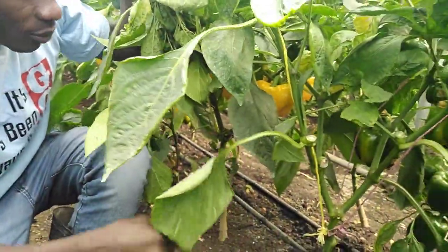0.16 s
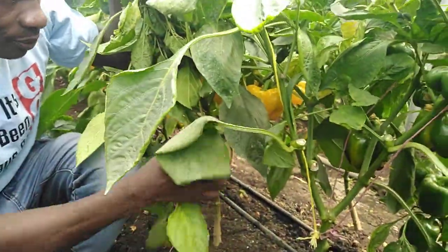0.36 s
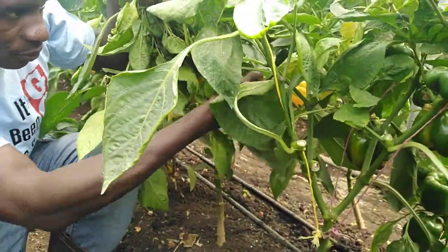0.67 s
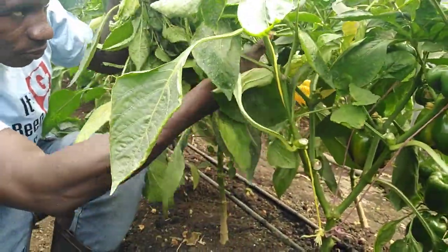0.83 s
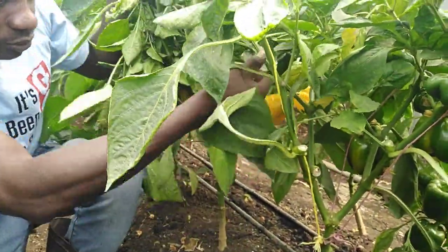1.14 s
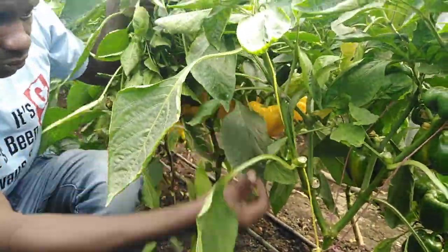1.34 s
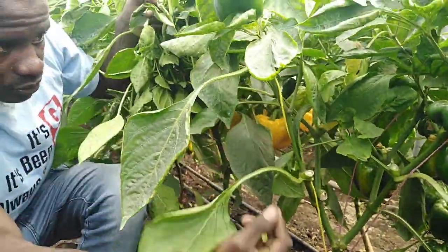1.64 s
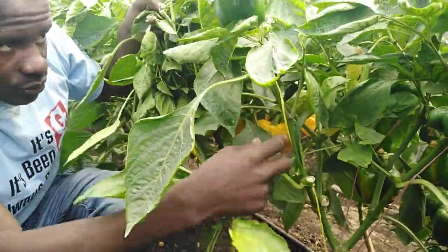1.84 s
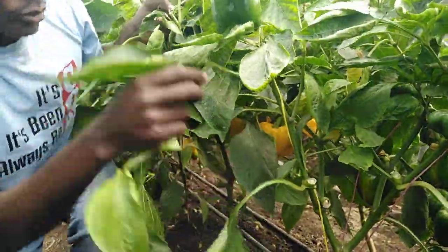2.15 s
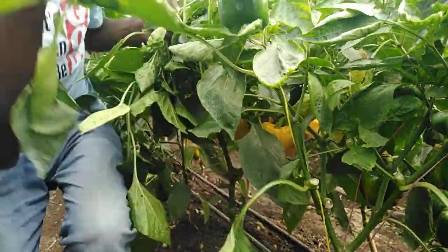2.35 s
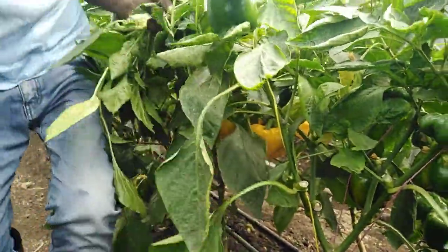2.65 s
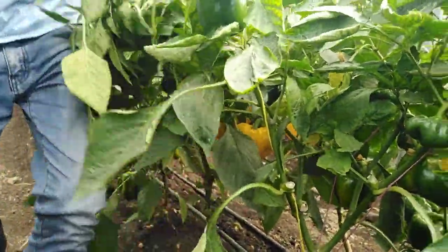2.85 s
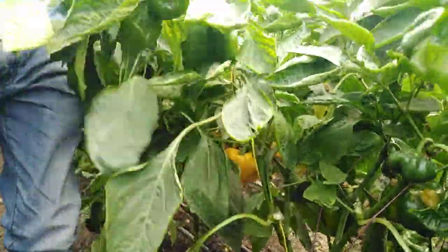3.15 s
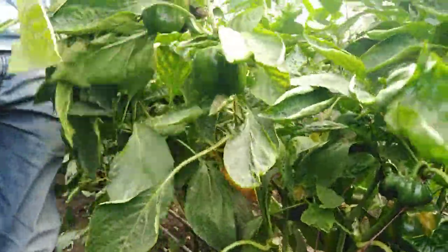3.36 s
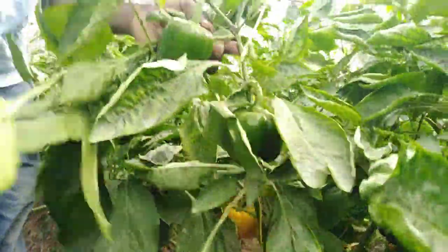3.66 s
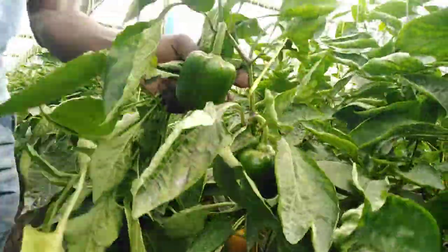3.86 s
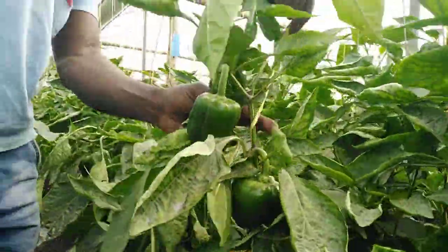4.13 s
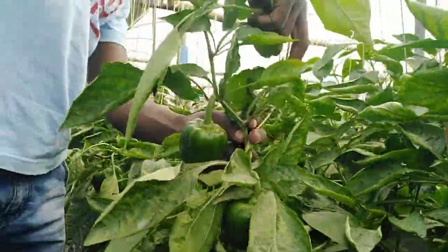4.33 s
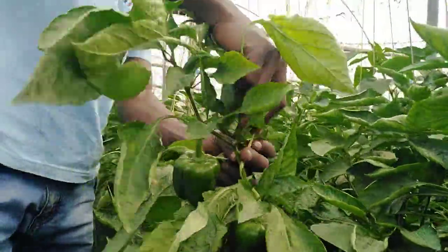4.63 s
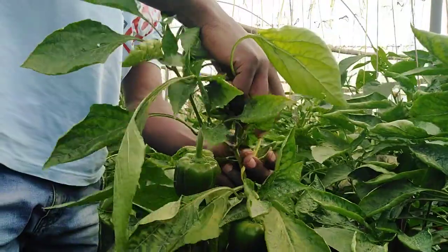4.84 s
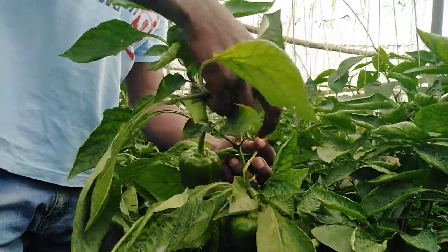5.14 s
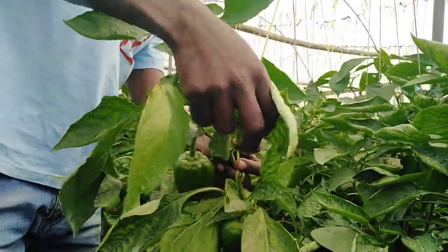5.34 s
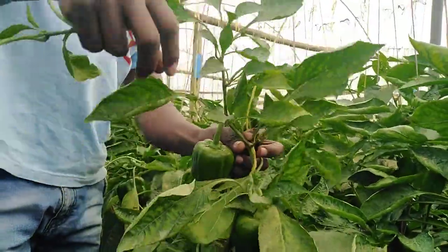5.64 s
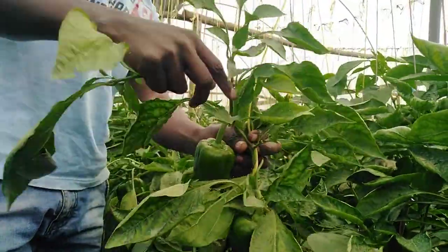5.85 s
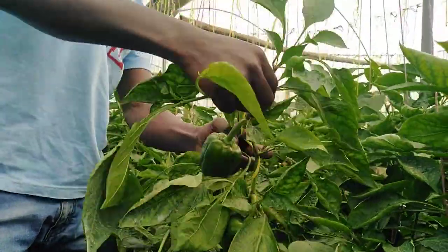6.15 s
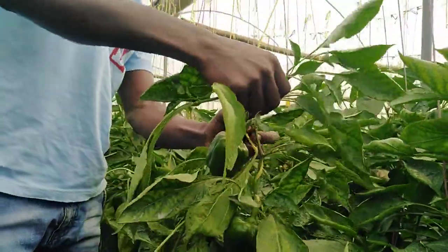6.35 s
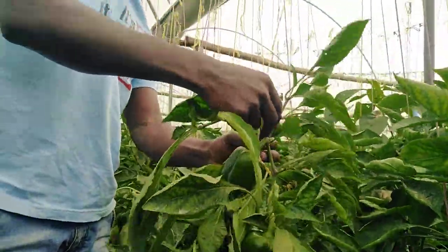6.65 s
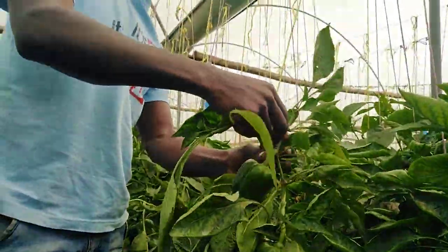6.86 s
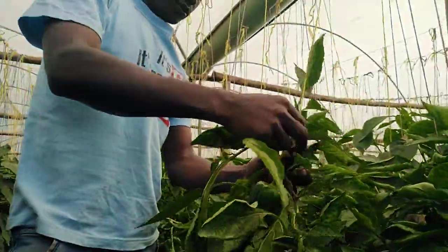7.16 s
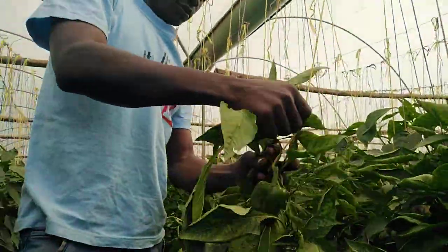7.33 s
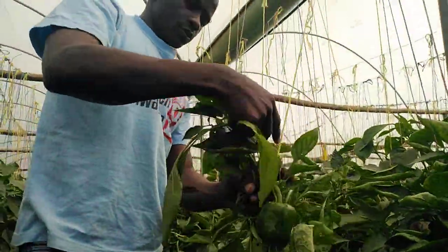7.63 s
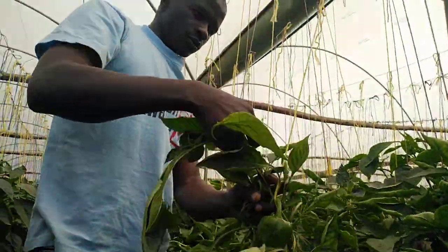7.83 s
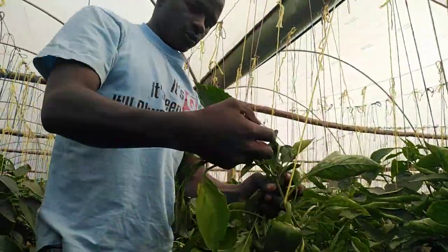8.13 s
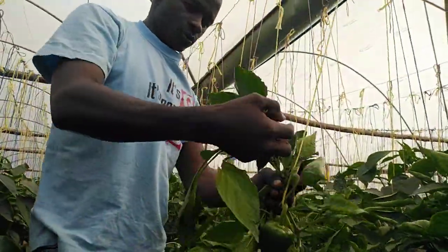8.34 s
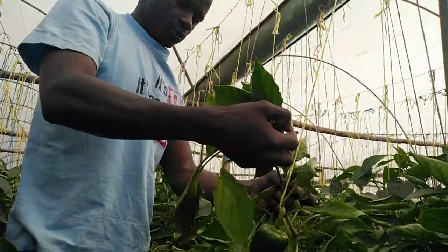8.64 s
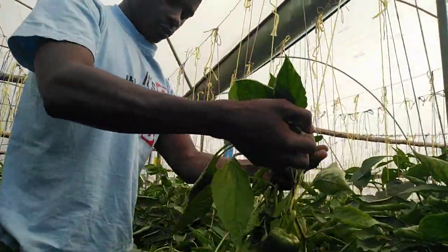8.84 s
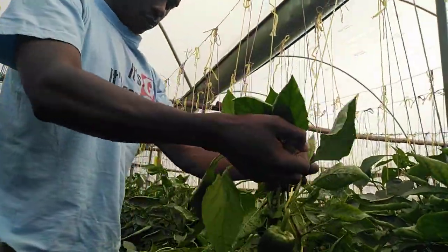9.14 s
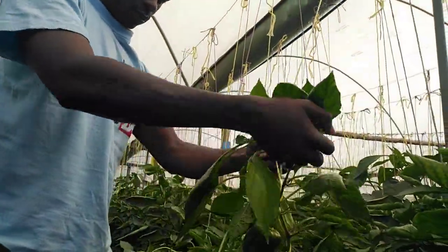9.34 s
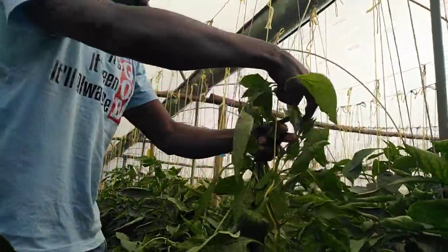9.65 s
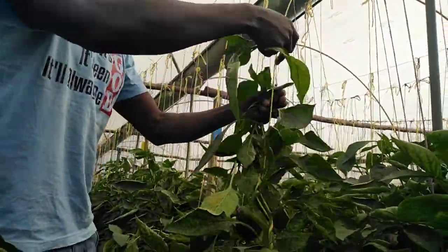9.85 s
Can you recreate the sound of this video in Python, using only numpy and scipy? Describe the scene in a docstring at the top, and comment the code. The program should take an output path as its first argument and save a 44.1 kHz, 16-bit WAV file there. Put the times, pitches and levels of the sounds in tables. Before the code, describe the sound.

Leaves rustle and crackle close by as hands prune pepper plants, with small, sharp stem snaps throughout.

```python
"""Pepper leaves crackle and rub as hands part and prune the plants in a plastic greenhouse.
The rustle is many tiny slips of leaf on leaf over smooth noise. Stems snap, flicked leaves slap,
plants sway with a low push, and a few leaves bump the nearby phone. Faint hollow knocks echo in the
distance, a few thin tones come and go, and air rumbles softly below. The phone's two spaced
microphones are strongest in the treble, and its noise suppressor turns the quiet parts down."""
import sys
import numpy as np
from scipy import signal
from scipy.fft import rfft, irfft, next_fast_len
from scipy.io import wavfile
from scipy.ndimage import uniform_filter1d, map_coordinates

SR = 44100
rng = np.random.default_rng(int(sys.argv[2]) if len(sys.argv) > 2 else 0)


def master_out(mix):
    """Clip the mix to full scale and print it as 16-bit PCM to the path in sys.argv[1]."""
    frames = np.transpose(np.atleast_2d(mix))
    ceiling = np.clip(frames, -1, 1)
    pcm = np.round(ceiling * 32767).astype(np.int16)
    wavfile.write(sys.argv[1], SR, pcm)


N = 440559

# Tone colours, or how strong each frequency is in a sound: (frequency [Hz], relative level [dB])
RUMBLE_COLOUR = [(25, -38), (45, -22), (65, -9.5), (90, -6.5), (125, -18), (170, -34.5), (300, -72)]
HISS_COLOUR = [(30, -36), (100, 1.5), (600, -8.5), (1000, -10), (2000, -6.5), (4000, -22), (7000, -19),
               (11000, -41), (14200, -27), (14600, -75.5)]
SWAY_COLOUR = [(53, -19), (90, -31), (192, -4), (503, -12), (672, 0.5), (831, 1.5), (1300, -14.5),
               (1690, -46), (2860, -120)]
SNAP_COLOUR = [(700, -36.5), (1500, -21), (2500, -20), (4000, -18), (5500, -6.5), (7500, 6), (9500, -8.5),
               (11500, -17.5), (14200, -20), (14800, -40), (16200, -49)]
RUB_COLOUR = [(500, -36.5), (850, -20.5), (1100, 1.5), (1600, -0.5), (2200, -3), (3200, -1.5), (4500, -1.5),
              (6000, -18), (9000, -87.5)]
CRACKLE_COLOUR = [(1760, -36.5), (3000, -23.5), (3850, -23), (5250, -7.5), (6300, -5), (7500, 1),
                  (8600, -6), (11400, -19), (14200, -23), (14600, -85.5)]
# Puffs of air: (start [s], hold [s], level [dB])
AIR_PUFFS = [(.8, .04, -82), (1.31, 0.051, -78), (1.96, 0.034, -73), (2.7, 0.039, -76), (2.86, 0.031, -73),
             (3.53, 0.28, -71), (4.93, 0.032, -73), (6.27, 0.034, -74), (6.38, 0.027, -74),
             (7.92, .05, -73.5), (8.05, 0.29, -82.5), (8.86, 0.057, -76), (9.64, 0.028, -62),
             (9.83, 0.036, -70)]
# Faint, thin tones: (start [s], length [s], first pitch [Hz], last pitch [Hz], level [dB])
THIN_TONE_GLIDES = [(6.69, 0.1, 740, 756, -78), (6.799, 0.059, 1180, 1240, -77),
                    (6.81, 0.086, 2350, 2700, -75), (7.939, 0.1, 1150, 1150, -70.5),
                    (9.308, 0.12, 4750, 4450, -66), (9.86, 0.14, 700, 692, -67.5)]
# Stems swaying near the phone: (start [s], hold [s], level [dB], centre [Hz])
STEM_SWAYS = [(.75, 0.45, -75, 774), (2.36, 0.22, -69, 510), (2.79, 0.18, -62.5, 574),
              (2.95, 0.305, -68.5, 420), (3.66, 0.14, -63, 300), (3.86, 0.047, -57, 302),
              (4.2, 0.12, -69, 650), (4.4, 0.82, -79, 770), (5.3, 0.078, -69, 704), (5.6, 0.18, -70, 700),
              (6.95, 1, -80, 736), (8.3, 0.21, -76.5, 775)]
# Distant hollow knocks: (time [s], level [dB], pitch [Hz], time to fade 60 dB [s])
HOLLOW_KNOCKS = [(0.287, -49, 660, 0.025), (0.523, -49.5, 617, 0.033), (2.089, -48.5, 900, 0.02),
                 (2.375, -47.5, 302, 0.061), (3.164, -50, 233, 0.027), (3.338, -37, 890, 0.011),
                 (3.339, -40, 288, 0.023), (3.7028, -27.5, 756, 0.0053), (3.705, -34, 242, 0.0098),
                 (4.235, -45, 600, 0.036), (5.655, -55.5, 373, 0.086), (5.775, -42, 670, 0.027),
                 (6.967, -48, 715, 0.037), (7.185, -57, 730, 0.06), (7.352, -38.5, 744, 0.025),
                 (7.569, -42.5, 708, 0.035), (7.913, -55.5, 210, 0.036), (8.371, -52.5, 775, 0.035)]
# A leaf hits the phone:
# (time [s], level [dB], hold [s], boom centre [Hz], boom's time to fade 60 dB [s], scrape over boom [dB])
PHONE_BUMPS = [(2.794, -65.5, 0.091, 440, 0.56, 12.5), (3.556, -35.5, 0.043, 221, 0.15, 1),
               (8.473, -50.5, 0.057, 245, 0.33, 0)]
# Leaf flicks and short scrapes: (time [s], level [dB], centre [Hz], hold [s])
LEAF_SLAPS = [(0.02, -38, 2420, 0.019), (0.069, -38, 2350, 0.0067), (0.081, -33, 2300, 0.0028),
              (0.111, -40.5, 2830, 0.0052), (0.438, -33, 1950, 0.0019), (2.092, -48.5, 1240, 0.0049),
              (2.377, -38, 1400, 0.0034), (3.703, -45, 2170, 0.0036), (5.156, -42, 1940, .001),
              (5.204, -41, 3750, .012), (5.304, -41, 2080, 0.0064), (5.571, -40, 2250, 0.0088),
              (5.621, -37, 1720, 0.014), (5.824, -36, 2300, 0.027), (6.665, -46, 1510, 0.0027),
              (7.082, -37.5, 4900, 0.018), (7.209, -45, 1470, 0.0078), (7.287, -42, 2170, 0.0057),
              (7.346, -43, 1720, 0.0045), (9.211, -44.5, 2340, 0.002)]
# Breaking stems: (time [s], level [dB], left over right [dB], time to fade 60 dB [s], swish level [dB])
STEM_SNAPS = [(0.0204, -36, -1, 0.023, 2), (0.0705, -38, 5, 0.018, 1), (0.085, -35.5, 0, .008, -20),
              (0.112, -32, -1, 0.011, -8), (0.229, -40, 1, 0.014, 2), (0.4, -37, 6, 0.013, -27),
              (0.511, -33, 10, 0.041, -25), (0.6156, -38, 2, 0.011, -18), (1.211, -30, -15, 0.0097, -31),
              (1.3616, -31.5, -15, 0.028, -29), (1.5192, -29.5, 4, 0.03, -19),
              (1.917, -43, 12, 0.0091, -29), (1.926, -34, 2, 0.028, -27), (1.963, -41.5, 9, .03, 1),
              (2.123, -35, 5, 0.014, 3), (2.343, -31.5, 1, 0.038, -2), (2.3797, -22, 3, 0.013, -10),
              (3.648, -24.5, 3, 0.0098, -34), (3.705, -43, 1.5, .012, -20), (4.1241, -28.5, 13, 0.012, -26),
              (4.143, -34, 11, .008, -11), (4.1575, -36.5, 6, 0.006, -5), (5.087, -26, 14, 0.015, -13.5),
              (5.541, -31, -2.5, 0.016, -18), (5.9684, -40, 18.5, 0.014, -18),
              (6.319, -31.5, 3.5, 0.025, 10), (6.382, -31, -1, 0.02, 8), (6.7728, -44.5, 10, 0.026, -22),
              (7.573, -30.5, 11, 0.0098, -17), (7.806, -44, -8, .03, -4), (7.925, -32, -1, 0.015, -4),
              (8.182, -38.5, 10, 0.019, 2), (8.3862, -29, -2, 0.039, -25), (8.42, -30, 11, 0.061, -23),
              (8.4592, -35, 13, 0.011, 4), (9.211, -28.5, 8, 0.028, -32), (9.305, -33.5, 5, 0.031, -19),
              (9.948, -36, -4, 0.0086, -14), (9.957, -29.5, -3, 0.012, -23)]
# Where the hands are: (time [s], left delay [samples], crackle's left over right [dB])
HAND_PLACES = [(0, 11, 3), (1.5, 3.5, 3), (3, 13.5, 3), (4, 6, 3), (4.7, 2, 6), (5.7, 2, 3.5), (6.2, 0, 5),
               (8, -3, 4), (9.2, -4.5, 6), (10, -2, 3.5)]
# The steady stir of the leaves: (time [s], crackle level [dB], rub over crackle [dB])
LEAF_STIR = [(0, -58.5, -13), (.03, -55.5, -11), (.59, -55.5, -9), (.71, -42.5, -10), (1.46, -55, -13),
             (1.56, -47.5, -9), (1.82, -51, -10.5), (1.9, -61, -12.5), (2.1, -46, -9), (3.5, -46.5, -7.5),
             (4.0, -48, -6.5), (4.11, -49.5, -10), (4.2, -46.5, -6.5), (4.7, -45, -15), (5.2, -45.5, -9.5),
             (5.8, -48, -8.5), (5.94, -52.5, -13), (6.15, -52, -7), (6.6, -52.5, -13), (6.75, -60, -10.5),
             (6.87, -65, -15.5), (6.92, -53.5, -7.5), (7.3, -49, -8), (8.0, -52, -13.5), (8.4, -46.5, -11),
             (8.68, -52.5, -14.5), (8.95, -46.5, -14), (9.15, -55.5, -17.5), (9.48, -52.5, -17.5),
             (9.6, -46, -19), (9.99, -49, -14)]
# A hand pushes through: (start [s], hold [s], crackle level [dB], rub over crackle [dB], rub centre [Hz])
HAND_SWEEPS = [(0.12, 0.038, -47, -4.5, 2380), (0.182, 0.0054, -50, -6.5, 2200),
               (0.249, 0.012, -41.5, -12, 2820), (0.309, 0.035, -48.5, -6, 2680),
               (0.757, 0.27, -41, -10, 2550), (1.082, 0.17, -38, -13, 2480), (0.413, 0.13, -51.5, -5, 2400),
               (1.261, 0.11, -49.5, -9.5, 2760), (1.83, 0.019, -54, -13, 2200),
               (2.045, 0.013, -48.5, -18, 2300), (2.206, 0.043, -46.5, -7, 1870),
               (2.365, 0.13, -51.5, -5, 2010), (2.68, 0.27, -43, -10.5, 2220),
               (3.579, 0.07, -43.5, -10, 1500), (3.784, 0.11, -46.5, -12, 2230),
               (4.216, 0.078, -42.5, -10, 2100), (4.432, 0.057, -48, -8.5, 3070),
               (4.567, 0.08, -38.5, -12.5, 2710), (4.702, 0.044, -42, -9.5, 2070),
               (4.993, 0.03, -36, -16.5, 1360), (5.077, 0.029, -42.5, -13.5, 2160),
               (5.315, 0.057, -36, -13, 2240), (5.476, 0.14, -46, -30, 2080),
               (5.682, 0.079, -50, -4.5, 1680), (6.039, 0.082, -46.5, -9.5, 2120),
               (6.333, 0.021, -46.5, -10.5, 2000), (6.385, 0.011, -45, -11, 1900),
               (7.1, 0.033, -47.5, -17, 2680), (7.19, 0.026, -47.5, -10.5, 1900),
               (7.465, 0.088, -44, -13, 2450), (7.6, 0.028, -45, -18, 2270),
               (7.714, 0.042, -48, -12.5, 2110), (7.822, 0.022, -48.5, -6.5, 2430),
               (8.038, 0.022, -48, -24, 2430), (7.909, 0.043, -47, -15.5, 2600),
               (8.232, 0.032, -40, -14, 2680), (8.456, 0.1, -48.5, -9.5, 2500),
               (4.794, 0.13, -46.5, -12.5, 1860), (9.118, 0.0081, -52, -16, 2530),
               (9.267, 0.0073, -51, -14, 2300), (8.752, 0.11, -48, -9, 2310),
               (9.542, 0.015, -42.5, -19.5, 2330), (9.755, 0.011, -41.5, -15.5, 2620),
               (9.815, 0.13, -43, -13, 2400)]
# The rub thins out below this edge: (time [s], frequency [Hz])
RUB_LOW_EDGE = [(0, 1100), (.36, 1800), (.45, 1010), (.6, 1600), (.72, 940), (1.3, 1010), (1.9, 1300),
                (2.2, 895), (4.9, 1090), (5.5, 900), (7.4, 970), (7.75, 1450), (8.05, 1770), (8.3, 1700),
                (8.5, 900), (8.68, 1290), (8.85, 1630), (9.05, 1830), (9.45, 1850), (9.55, 1330),
                (9.68, 1950), (9.85, 1250)]
# How the two microphones differ: (frequency [Hz], left over right [dB])
MIC_BALANCE = [(60, 1.5), (500, 0.5), (1300, 5), (2400, 4), (4400, -4.5), (6500, -6), (8500, 4.5),
               (11500, 2), (14000, 0.5)]


def amp(db):
    return 10 ** (np.asarray(db) / 20)


def unit_rms(x):
    return x / np.sqrt(np.mean(x ** 2) + 1e-20)


def unit_peak(x):
    return x / np.abs(x).max()


def levelled(x):
    """Even out slow changes in loudness."""
    power = np.abs(uniform_filter1d(np.mean(x ** 2, 0), SR // 4))
    return unit_rms(x / np.sqrt(power + 1e-20))


def sides(db):
    """Left and right gains that put the left db above the right."""
    return amp(np.array([db / 2, -db / 2]))


def add_at(track, start_s, sound):
    """Mix a sound into the track."""
    track[:, round(start_s * SR):][:, :sound.shape[-1]] += sound


def along(points, hz):
    """Read between (frequency, value) points on a log frequency scale."""
    freqs, values = np.transpose(points)
    return np.interp(np.log(hz + 1), np.log(freqs + 1), values)


def curves(rows):
    """One value per sample for each column after the time."""
    times, *columns = np.transpose(rows)
    return [np.interp(np.arange(N) / SR, times, column) for column in columns]


def wobble(rate, size=N):
    """A smooth curve through `rate` random points a second."""
    points = rng.standard_normal(int(N * rate / SR) + 4)
    return map_coordinates(points, [np.arange(size) * rate / SR])


def swells(rows, rise_db_per_s, fall_db_per_s, rest_db, rest_hz=1):
    """Gain and centre curves for (start, hold, level[, centre]) rows; louder rows pull the centre more."""
    t, rows = np.arange(0, N / SR, 1 / 1000), np.asarray(rows)
    start, hold, db = rows.T[:3, :, None]
    before, after = np.maximum(start - t, 0), np.maximum(t - start - hold, 0)
    power = amp(2 * (db - rise_db_per_s * before - fall_db_per_s * after))
    rest = amp(2 * np.interp(t, np.arange(N) / SR, rest_db * np.ones(N)))
    total = power.sum(0) + rest
    centre = (rows[:, -1] @ power + rest_hz * rest) / total
    return curves(np.transpose([t, np.sqrt(total), centre]))


def coloured(x, colour, size=4096):
    """Give x a tone colour, using a filter that rings only after each hit."""
    db = np.maximum(along(colour, np.fft.rfftfreq(size, 1 / SR)), -90)
    cepstrum = irfft(np.log(amp(db)))
    cepstrum[1:size // 2] *= 2  # move the early ringing to after the hit
    cepstrum[size // 2 + 1:] = 0
    pulse = irfft(np.exp(rfft(cepstrum)))
    return signal.fftconvolve(x, pulse[None] / np.linalg.norm(pulse), axes=1)[:, :N]


def resonance(x, hz, width):
    """Keep a broad band around hz; width is a share of that frequency."""
    return signal.lfilter(*signal.iirpeak(hz, 1 / width, SR), x)


def blur(grid, bands, frames):
    """Smooth a grid over frequency, then over time."""
    return uniform_filter1d(uniform_filter1d(grid, bands, 0), frames, 1)


def patchy(x, broad_db, fine_db, centre_hz=None, db_per_octave=0, edge_hz=None):
    """Each leaf has its own colour: random louder and softer patches, plus an optional peak and low edge."""
    hz, t, spectrum = signal.stft(x, SR, nperseg=512)
    hz, at = hz[:, None] + 40, np.minimum((t * SR).astype(int), N - 1)
    broad = blur(rng.standard_normal(spectrum.shape[1:]), 9, 6)
    fine = blur(rng.standard_normal(spectrum.shape[1:]), 2, 12)
    gain_db = broad_db * unit_rms(broad) + fine_db * unit_rms(fine)
    if centre_hz is not None:
        gain_db -= db_per_octave * np.abs(np.log2(hz / centre_hz[at]))
    if edge_hz is not None:
        gain_db -= 42 * np.maximum(np.log2(edge_hz[at] / hz), 0)  # 42 dB an octave
    return signal.istft(spectrum * amp(gain_db), nperseg=512)[1][:, :N]


def nearly_mono(apart):
    """Noise that reaches both microphones almost alike."""
    shared, own = rng.standard_normal((2, N))
    return np.array([shared + apart * own, shared - apart * own])


def burst(t, rise_s, fade_s, hold_s=0):
    """A quick burst of noise, partly alike at both microphones; it drops 60 dB in fade_s."""
    shared, own = rng.standard_normal(len(t)), rng.standard_normal((2, len(t)))
    fade = amp(-60 * np.maximum(t - hold_s, 0) / fade_s)
    return (shared + 1.94 * own) * fade * (1 - np.exp(-t / rise_s))


def air():
    """Moving air rumbles in soft puffs under a faint, steady hiss."""
    rumble = coloured(nearly_mono(0.38), RUMBLE_COLOUR, size=16384)
    rumble = unit_rms(rumble * amp(1.9 * wobble(4.4) + 1.3 * wobble(16)))
    hiss = unit_rms(coloured(nearly_mono(0.66), HISS_COLOUR))
    gain, _ = swells(AIR_PUFFS, rise_db_per_s=350, fall_db_per_s=250, rest_db=-85.5)
    return gain * rumble + amp(-83) * hiss


def thin_tones(blur_hz=150):
    """Faint, thin, fuzzy tones that glide slightly in pitch."""
    out = np.zeros((2, N + SR))
    for start, length, from_hz, to_hz, db in THIN_TONE_GLIDES:
        n = round(length * SR)
        phase = 2 * np.pi * np.cumsum(np.linspace(from_hz, to_hz, n)) / SR
        band = wobble(blur_hz, n) * np.sin(phase) + wobble(blur_hz, n) * np.cos(phase)
        add_at(out, start, band * np.sqrt(np.hanning(n)) * amp(db))
    return out[:, :N]


def swaying_stems():
    """Swaying plants make low, lumpy pushes of noise, each with its own colour."""
    gain, hz = swells(STEM_SWAYS, rise_db_per_s=308, fall_db_per_s=130, rest_db=-89, rest_hz=497)
    lumps = amp(3.6 * wobble(60) + 2.8 * wobble(37))
    push = patchy(nearly_mono(0.57) * lumps, broad_db=1.0, fine_db=4.5, centre_hz=hz, db_per_octave=6.0)
    return gain * levelled(coloured(push, SWAY_COLOUR))


def knocks():
    """Distant hollow taps: a fast-fading tone with a fuzzy echo from the plastic walls."""
    out, t = np.zeros((2, N + SR)), np.arange(SR // 2) / SR
    for start, db, hz, fade_s in HOLLOW_KNOCKS:
        wander = 0.07 * np.cumsum(rng.standard_normal(len(t)))  # blurs the pitch
        shape = amp(-60 * t / fade_s) * (1 - np.exp(-t / (0.083 * fade_s)))
        tap = np.sin(2 * np.pi * hz * t + wander) * shape
        walls = rng.standard_normal((2, len(t))) * amp(-30 - 60 * t / 0.26)
        echo = signal.fftconvolve(walls, tap[None], axes=1)[:, :len(t)]
        add_at(out, start, amp(db) * (tap + echo))
    return out[:, :N]


def phone_bumps():
    """A leaf drags across the phone's body: a rough scrape and a dull boom that outlasts it."""
    out, t = np.zeros((2, N + SR)), np.arange(SR // 2) / SR
    low_cut = signal.butter(2, 60, "high", fs=SR)
    rise = 1 - np.exp(-t / 0.039)
    for start, db, hold, hz, fade_s, scrape_db in PHONE_BUMPS:
        after = np.maximum(t - hold, 0)
        rough = nearly_mono(0.22)[:, :len(t)] * amp(2.4 * wobble(97, len(t)))
        boom = signal.lfilter(*low_cut, resonance(resonance(rough, hz, 1.5), hz, 1.5))
        boom = unit_rms(boom) * amp(-60 * after / fade_s)
        scrape = resonance(resonance(rough, 540, 3.0), 740, 2.6)
        scrape = unit_rms(scrape) * amp(scrape_db - 60 * after / 0.12)
        add_at(out, start, amp(db) * rise * (boom + scrape))
    return out[:, :N]


def leaf_slaps(width=0.56):
    """Flicked leaves give short, soft slaps, each at its own pitch."""
    out, t = np.zeros((2, N + SR)), np.arange(SR // 5) / SR
    for start, db, hz, hold in LEAF_SLAPS:
        flick = burst(t, rise_s=0.00064, fade_s=0.049, hold_s=hold)
        slap = resonance(resonance(flick, hz, width), hz, width)
        add_at(out, start, amp(db) * unit_peak(slap))
    return out[:, :N]


def stem_snaps():
    """One fibre cracks sharply, the rest follow, and the freed leaves swish."""
    out, t = np.zeros((2, N + SR)), np.arange(SR // 5) / SR
    first_crack = amp(18.5) * (t == 0)
    for start, db, left_db, fade_s, swish_db in STEM_SNAPS:
        fibres = burst(t, rise_s=0.00024, fade_s=fade_s)
        swish = amp(swish_db) * burst(t, rise_s=0.0028, fade_s=0.073)
        snap = coloured(first_crack + fibres + swish, SNAP_COLOUR, size=512)[:, :len(t)]
        add_at(out, start, amp(db) * sides(left_db)[:, None] * unit_peak(snap))
    return out[:, :N]


def leaf_slips(count, spread_db, clump_db, scatter_samples, noise_share):
    """Tiny clicks of leaf slipping on leaf, each from its own direction, over smooth noise."""
    when, strength, direction = rng.random((count, 3)).T
    at = (when * (N - 200)).astype(int) + 100
    size = rng.standard_normal(count) * amp(-spread_db * np.log(strength + .02))
    delay = np.round(curves(HAND_PLACES)[0][at] + scatter_samples * (direction - .5)).astype(int)
    left = np.bincount(np.clip(at + delay, 0, N - 1), size, N)
    right = np.bincount(at, size, N)
    clicks = unit_rms(np.array([left, right]))
    mix = np.sqrt(1 - noise_share) * clicks + np.sqrt(noise_share) * rng.standard_normal((2, N))
    clumps = 0.86 * wobble(11) + 0.64 * wobble(34) + 1.38 * wobble(90) + 0.91 * wobble(240)
    return unit_rms(mix * amp(clump_db * clumps))


def rustling_leaves():
    """Hands stir up a dry, high crackle and a softer rub whose colour moves with the dragged leaf."""
    stir_db, stir_rub_db = curves(LEAF_STIR)
    slopes = dict(rise_db_per_s=340, fall_db_per_s=272)
    crackle_gain, _ = swells(HAND_SWEEPS, **slopes, rest_db=stir_db)
    crackle = leaf_slips(50000, spread_db=2.76, clump_db=0.87, scatter_samples=5, noise_share=0.7)
    crackle = patchy(crackle, broad_db=1.2, fine_db=2.5)
    crackle = unit_rms(coloured(crackle, CRACKLE_COLOUR)) * sides(curves(HAND_PLACES)[1])

    rub_sweeps = [(start, hold, db + rub_db, hz) for start, hold, db, rub_db, hz in HAND_SWEEPS]
    rub_gain, rub_hz = swells(rub_sweeps, **slopes, rest_db=stir_db + stir_rub_db, rest_hz=2380)
    edge_hz = curves(RUB_LOW_EDGE)[0]
    rub = leaf_slips(12000, spread_db=1.5, clump_db=0.37, scatter_samples=3.7, noise_share=0.73)
    rub = patchy(rub, broad_db=1.06, fine_db=4.0, centre_hz=rub_hz, db_per_octave=11.0, edge_hz=edge_hz)
    rub = levelled(coloured(rub, RUB_COLOUR))
    return crackle_gain * crackle + rub_gain * rub


def scene():
    pruning = rustling_leaves() + stem_snaps() + leaf_slaps()
    return pruning + knocks() + swaying_stems() + phone_bumps() + air() + thin_tones()


def noise_suppressor(x, margin_db, depth_db):
    """The phone turns a frequency down further as it sinks to its usual level or below."""
    spectrum = signal.stft(x, nperseg=512)[2]
    power = np.abs(blur(np.mean(np.abs(spectrum) ** 2, 0), 2, 5)) + 1e-16
    usual = np.exp(uniform_filter1d(np.log(power), size=250, axis=1))
    floor = usual * amp(2 * margin_db)
    gain = np.sqrt(np.clip(1 - floor / power, amp(-2 * depth_db), 1))
    return signal.istft(spectrum * uniform_filter1d(gain, size=3, axis=1), nperseg=512)[1][:, :N]


def record(dry, top_hz=16200):
    """The two microphones differ in colour; the phone then suppresses noise and cuts the top treble."""
    size = next_fast_len(N + SR // 2)
    hz = np.fft.rfftfreq(size, 1 / SR)
    mics = irfft(rfft(dry, size) * sides(along(MIC_BALANCE, hz)), size)[:, :N]
    cleaned = noise_suppressor(mics, margin_db=-9.0, depth_db=10.5)
    return irfft(rfft(cleaned, size) * (hz < top_hz), size)[:, :N]


dry = scene()
out = record(dry)
master_out(out)
```